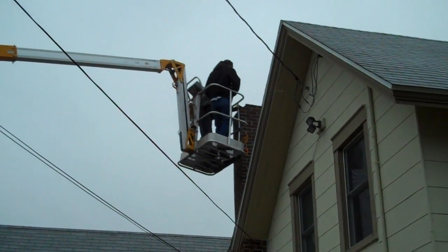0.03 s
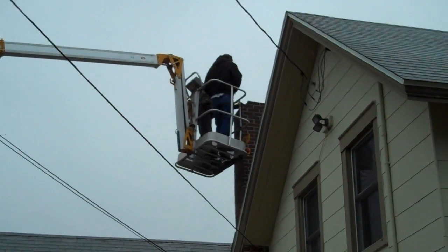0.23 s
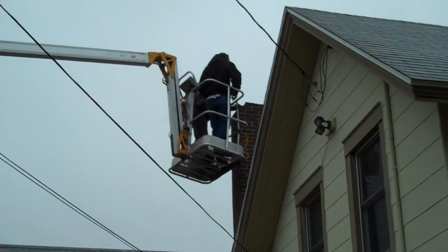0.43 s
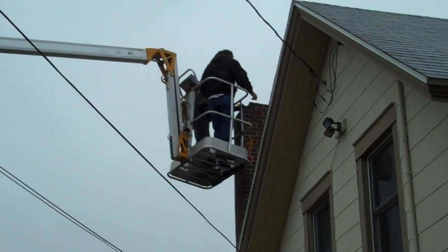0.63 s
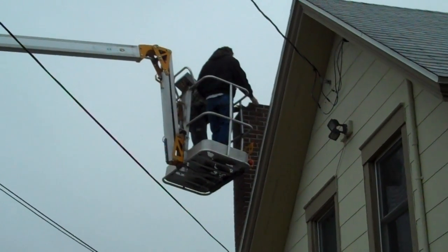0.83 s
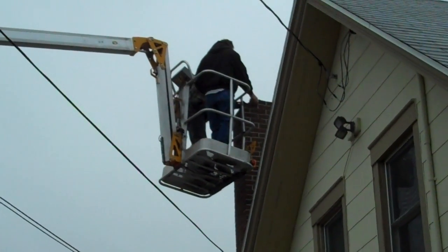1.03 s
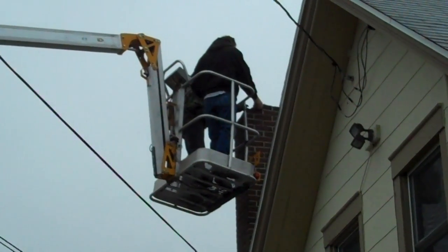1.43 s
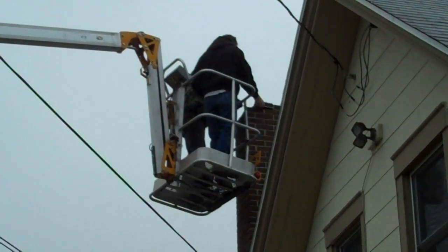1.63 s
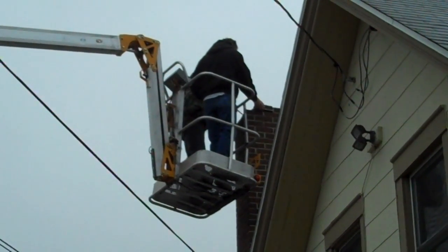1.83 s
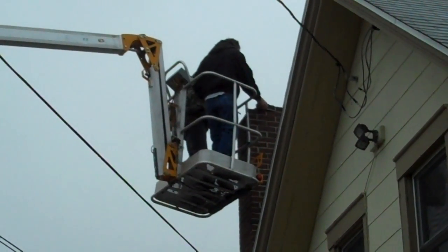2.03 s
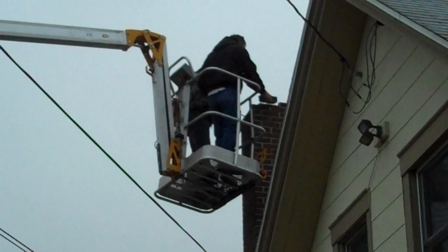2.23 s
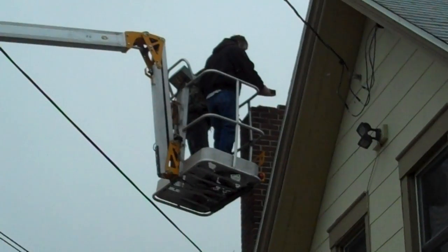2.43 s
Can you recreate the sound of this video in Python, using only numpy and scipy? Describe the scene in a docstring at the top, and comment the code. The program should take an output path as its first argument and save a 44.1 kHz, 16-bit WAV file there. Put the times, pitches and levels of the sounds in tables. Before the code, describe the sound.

A brick lands with a loud crash at 0.2 seconds, just after one dry knock, cracking, crumbling and ringing briefly in a yard. Four sharp masonry knocks follow at about 0.3, 0.6, 0.9 and 1.2 seconds. A faint scrape runs from 1.3 to 1.8 seconds, with tiny grit ticks until 2.3. Throughout, a distant lift engine drones quietly with a thin hiss, and light wind rumbles on the microphone.

```python
"""A dry knock of masonry over a distant engine, then a brick lands hard beside a house. A man in a boom lift is
taking down the chimney. The crash cracks, crumbles and booms, and the struck surface rings. More short knocks
follow, each a click with a stony ring, echoing off ground and yard; then a faint scrape and a few ticks of
grit. Underneath, the lift's engine drones with a high hiss above it, and a little wind rumbles on the
microphone."""
import sys
import numpy as np
from scipy import signal
from scipy.fft import rfft, irfft
from scipy.io import wavfile

SR = 44100
rng = np.random.default_rng(int(sys.argv[2]) if len(sys.argv) > 2 else 0)


def log_audio(samples):
    """Write samples as a 16-bit WAV file to the path given in sys.argv[1]."""
    # one column per channel
    frames = np.atleast_2d(samples).T
    # limit to full scale, then quantise
    limited = np.clip(frames, -1, 1)
    pcm = np.round(limited * 32767).astype(np.int16)
    wavfile.write(sys.argv[1], SR, pcm)


N = 114660
T = np.arange(N) / SR
FREQS = np.fft.rfftfreq(N, 1 / SR)


def amp(db):
    """Decibels to gain."""
    return 10 ** (np.asarray(db) / 20)


def unit(x):
    """Scales to rms 1."""
    return x / np.sqrt(np.mean(x ** 2) + 1e-20)


def curve_at(points, hz):
    """Reads a curve on a log-frequency axis."""
    f, value = np.transpose(points)
    return np.interp(np.log(hz + 1), np.log(f + 1), value)


def fader(points):
    """A gain ride through points of time in seconds and level in dB."""
    return amp(np.interp(T, *np.transpose(points)))


def fade(t, t60):
    """Exponential decay, 60 dB down after t60 seconds."""
    return np.exp(-np.log(1000) * t / t60)


def pan(db):
    """Stereo gains that put the left side db above the right."""
    return amp(np.array([[.5], [-.5]]) * db)


def add(mix, start, sound):
    """Mixes a sound in at a start time in seconds."""
    part = mix[:, max(round(start * SR), 0):][:, :sound.shape[-1]]
    part += sound[..., :part.shape[1]]


def noise(colour, likeness, lag=0, size=N):
    """Coloured stereo noise of rms 1; likeness 1 makes both sides alike, the left lag seconds late."""
    hz = np.fft.rfftfreq(size, 1 / SR)
    shared, separate = rfft(rng.standard_normal((2, size)))
    left = shared * np.exp(-2j * np.pi * hz * lag)
    right = likeness * shared + np.sqrt(1 - likeness ** 2) * separate
    return unit(irfft(np.array([left, right]) * amp(curve_at(colour, hz)), size))


def narrow_noise(hz, width_hz, size=N):
    """Noise in one resonance, rms 1."""
    detune = (np.fft.rfftfreq(size, 1 / SR) - hz) / (width_hz / 2)
    return unit(irfft(rfft(rng.standard_normal(size)) / (1 + detune ** 2), size))


def uneven(roughness, grain_hz):
    """A randomly lumpy gain of rms 1."""
    return unit(np.exp(roughness * narrow_noise(0, grain_hz)))


def click(colour, size=4096):
    """A minimum-phase click of energy 1 with the given colour."""
    log_gain = np.log(amp(curve_at(colour, abs(np.fft.fftfreq(size, 1 / SR)))))
    pulse = np.fft.ifft(np.exp(signal.hilbert(log_gain).conj())).real
    return pulse / np.linalg.norm(pulse)


def ring(modes, t):
    """Dying sines, neighbours starting in opposite directions."""
    return sum((-1) ** k * amp(db) * fade(t, t60) * np.sin(2 * np.pi * hz * t)
               for k, (hz, db, t60) in enumerate(modes))


def centre_bass(x, corner_hz):
    """Narrows the low end: long waves reach both sides alike."""
    spectrum = rfft(x)
    to_centre = spectrum.mean(0) - spectrum
    return irfft(spectrum + to_centre / (1 + (FREQS / corner_hz) ** 2), N)


# The roar's colour. Each row: frequency in Hz, relative level in dB.
ROAR_COLOUR = [(30, -18), (100, -8), (160, -1.5), (220, -2.5), (300, -7), (480, -6.5), (640, -1.5),
               (800, 2.5), (1000, -1.5), (1450, -0.06), (2100, -7), (3100, -10), (4000, -16), (5500, -20),
               (9000, -51), (14000, -53)]
# Its fader ride. Each row: time in seconds, level in dB.
ROAR_RIDE = [(0, -36), (.5, -37), (1, -37.5), (1.5, -38.5), (1.9, -39.5), (2.6, -39)]
FAR_LIKENESS, FAR_LAG_S = 0.69, 0.00013


def engine_roar():
    """The lift's engine at a distance: a broad roar that eases off slightly."""
    return noise(ROAR_COLOUR, FAR_LIKENESS, FAR_LAG_S) * fader(ROAR_RIDE)


# The hum's fader ride. Each row: time in seconds, level in dB.
HUM_RIDE = [(0, -60), (1.1, -52), (1.7, -59), (2, -54.5), (2.6, -57.5)]


def engine_hum():
    """The engine's low note, a band of noise so narrow that it wavers."""
    return narrow_noise(hz=154.8, width_hz=17) * fader(HUM_RIDE)


# The hiss's colour. Each row: frequency in Hz, relative level in dB.
HISS_COLOUR = [(1000, -13.5), (3000, -5.5), (4000, -7.5), (5200, -1), (5900, 3), (6450, -6), (7250, -3),
               (8200, -14), (9500, -21), (12300, -21.5), (14500, -28)]
# Its fader ride. Each row: time in seconds, level in dB.
HISS_RIDE = [(0, -37.5), (.17, -39.5), (.55, -46.5), (1.1, -46.5), (1.4, -45), (1.9, -49.5), (2.6, -51)]


def high_hiss():
    """A thin hiss, strongest at the start."""
    return noise(HISS_COLOUR, likeness=.5, lag=FAR_LAG_S) * fader(HISS_RIDE)


# The wind's colour. Each row: frequency in Hz, relative level in dB.
WIND_COLOUR = [(15, -10), (42, 2.5), (70, 0.5), (120, -3.5), (250, -15.5), (600, -36)]
# Its gusts. Each row: time in seconds, level in dB.
WIND_GUSTS = [(0, -56.5), (.8, -63), (1.4, -59), (1.53, -52), (1.7, -59), (2.12, -48), (2.35, -57.5),
              (2.5, -48.5), (2.6, -52)]


def wind():
    """Small gusts rumble on the microphone, wide and leaning right."""
    return noise(WIND_COLOUR, likeness=0.12) * fader(WIND_GUSTS) * pan(db=-5)


# Knock cues. Each row: start in seconds, level in dB, ring pitch in Hz, ring trim in dB,
# treble shelf in dB, left over right in dB.
KNOCK_CUES = [(0.0335, -2.5, 4560, 2.5, -6.5, -1.5), (.3417, -.5, 3206, 3, -2.5, -1),
              (0.3437, -7.5, 3490, 1, 2, -1), (.6461, .5, 3130, 0.5, 0.5, .5),
              (0.9231, -0.5, 4420, 1.5, -1, -1.5), (1.1958, 0.5, 3300, 2.5, -0.5, -1)]
# The stony ring all knocks share. Each row: pitch in Hz, relative level in dB, t60 in seconds.
STONE_MODES = [(925, -30.5, 0.036), (1715, -28.5, .02), (2470, -35, 0.021), (3600, -33, 0.018),
               (5490, -25.5, .012), (6380, -36, .014), (7260, -24, 0.0088)]
# The contact click, which colours the whole knock. Each row: frequency in Hz, relative level in dB.
CONTACT_COLOUR = [(100, -24), (400, -7.5), (900, 1), (1400, 2.5), (2000, -1.5), (3500, 4), (4800, -4),
                  (6300, 4), (7500, 0.5), (8400, -12.5), (10000, -24.5), (14000, -39)]
# Flat noise for grit and echo tails. Each row: frequency in Hz, relative level in dB.
WHITE = [(20, 0), (20000, 0)]
SHELF_HZ, GROUND_ECHO_S, GROUND_ECHO_DB = 5000, .0056, -13


def knocks(size=4096):
    """Masonry knocks: each a click, a short stony ring and a puff of grit, echoed by the ground."""
    out, t = np.zeros((2, N)), T[:size]
    for start, db, hz, ring_db, treble_db, side_db in KNOCK_CUES:
        contact = click([(f, gain_db + treble_db / (1 + (SHELF_HZ / f) ** 6))
                         for f, gain_db in CONTACT_COLOUR])
        impulse = amp(-5) * (t == 0)
        own_ring = amp(ring_db - 21.5) * fade(t, t60=0.015) * np.sin(2 * np.pi * hz * t)
        stone = impulse + ring(STONE_MODES, t) + own_ring
        grit = amp(-17) * noise(WHITE, likeness=0.65, size=size) * fade(t, t60=0.027)
        knock = signal.fftconvolve(stone + grit, contact[None], axes=1) * amp(db) * pan(side_db)
        add(out, start, knock)
        add(out, start + GROUND_ECHO_S, amp(GROUND_ECHO_DB) * knock)
    return out


# The bump's cue. Each row: start in seconds, level in dB.
BUMP_CUES = [(0.0789, -25.5)]
# Its colour. Each row: frequency in Hz, relative level in dB.
BUMP_COLOUR = [(60, -14), (400, -2), (900, 0.5), (1800, -5.5), (3000, -18), (7000, -19), (10000, -35)]


def bump(size=4096):
    """A soft, dull bump just ahead of the crash."""
    out, t = np.zeros((2, N)), T[:size]
    for start, db in BUMP_CUES:
        add(out, start, amp(db) * noise(BUMP_COLOUR, likeness=.9, size=size) * fade(t, t60=0.043))
    return out


# Colours of the crash's three layers. Each row: frequency in Hz, relative level in dB.
CRACK_COLOUR = [(200, -25), (1200, -16), (3000, -8.5), (4800, -8), (6000, 1), (7000, -1.5), (8500, -14.5),
                (11000, -17), (14500, -32)]
CRUMBLE_COLOUR = [(100, -19), (400, -3.5), (750, -2.5), (1250, -1.5), (1700, -1.5), (2100, -6), (2900, .5),
                  (4300, -8.5), (5100, -3), (5900, 2.5), (7300, 0), (8600, -15.5), (11000, -25),
                  (14000, -39)]
BOOM_COLOUR = [(40, -26), (70, -13), (100, -1), (220, -2), (290, -2.5), (390, 4), (520, -5.5), (1000, -12),
               (3000, -30.5)]
# Pieces landing late. Each row: start in seconds, level in dB, t60 in seconds.
LATE_PIECES = [(.233, -19, 0.095), (0.269, -21, 0.085), (.279, -26, 0.046)]
# Low thuds of the structure. Each row: start in seconds, level in dB, pitch in Hz, t60 in seconds.
THUD_CUES = [(.219, -28, 249, 0.099), (.262, -30, 384, 0.18), (.288, -29.5, 199, 0.11),
             (.29, -32, 105, .13)]
# The struck surface's ring. Each row: pitch in Hz, level in dB, t60 in seconds.
SURFACE_MODES = [(338.4, -35.5, 0.6), (398, -31.5, 0.43), (691, -25, 0.23), (728, -24.5, .18),
                 (1190, -18, 0.15), (1671, -17, 0.14), (2550, -26, .2), (3240, -29, .15), (5610, -22, 0.25),
                 (6020, -23, .18), (6212, -20, 0.23), (6590, -29, .2)]
# Panning by band, on top of each layer's own. Each row: frequency in Hz, left over right in dB.
CRASH_LEAN = [(100, -0.5), (2400, -0.5), (4400, -4), (6500, -4.5), (8000, 12), (10000, 14), (14500, 15)]
CRASH_S, CRASH_LAG_S = .2, .00002
THUD_RISE_S, SURFACE_RISE_S = 0.0066, 0.0028


def brick_crash():
    """The brick lands: bright crack, dense crumble, slower boom, late pieces, thuds, ringing surface."""
    out, t = np.zeros((2, N)), T[:SR]
    crack = crash_layer(CRACK_COLOUR, rise_s=0.12, t60=0.0868, likeness=0.55)
    crumble = crash_layer(CRUMBLE_COLOUR, rise_s=0.01, t60=0.3177, likeness=1)
    boom = crash_layer(BOOM_COLOUR, rise_s=0.03, t60=0.56, likeness=0.5)
    add(out, CRASH_S, amp(-5) * crack * pan(db=0.5))
    add(out, CRASH_S - 0.002, amp(-10.5) * crumble * pan(db=-1))
    add(out, CRASH_S + 0.04, amp(-27) * boom * pan(db=-1.5))
    for start, db, t60 in LATE_PIECES:
        add(out, start, amp(db) * noise(CRUMBLE_COLOUR, likeness=0.77, size=SR) * fade(t, t60))
    for start, db, hz, t60 in THUD_CUES:
        add(out, start, ring([(hz, db, t60)], t) * np.minimum(t / THUD_RISE_S, 1))
    add(out, CRASH_S, ring(SURFACE_MODES, t) * np.minimum(t / SURFACE_RISE_S, 1))
    return irfft(rfft(out) * pan(curve_at(CRASH_LEAN, FREQS)), N)


def crash_layer(colour, rise_s, t60, likeness):
    """Many contacts falling unevenly: grainy noise that is already decaying as it ramps in."""
    contacts = noise(colour, likeness, CRASH_LAG_S) * uneven(roughness=0.24, grain_hz=450)
    return contacts * np.minimum(T / rise_s, 1) * fade(T, t60)


# The scrape's colour. Each row: frequency in Hz, relative level in dB.
SCRAPE_COLOUR = [(500, -23), (1100, -12), (1480, 2), (2000, -7), (2500, -13), (4000, -20), (6000, -13),
                 (12000, -42)]
# Its fader ride. Each row: time in seconds, level in dB.
SCRAPE_RIDE = [(0, -88), (1.15, -67), (1.3, -45.5), (1.6, -43.5), (1.75, -47), (1.9, -70)]


def scrape():
    """Masonry rubs faintly and unevenly, off to the right."""
    rub = noise(SCRAPE_COLOUR, FAR_LIKENESS, FAR_LAG_S) * uneven(roughness=0.46, grain_hz=60)
    return rub * fader(SCRAPE_RIDE) * pan(db=-4.5)


# Grit cues. Each row: start in seconds, level in dB, pitch in Hz.
TICK_CUES = [(1.2515, -42, 6800), (1.594, -44.5, 12000), (1.605, -53, 11000), (2.253, -46, 7000)]


def grit_ticks(size=4096):
    """Bits of grit tick faintly, each a tiny burst of bright noise."""
    out, t = np.zeros((2, N)), T[:size]
    for start, db, hz in TICK_CUES:
        add(out, start, amp(db) * narrow_noise(hz, width_hz=2800, size=size) * fade(t, t60=.025))
    return out


def reverberate(x, tail):
    """Plays a sound through a stereo tail, scaled to energy 1 on the left."""
    return signal.fftconvolve(x, tail / np.linalg.norm(tail[0]), axes=1)[:, :N]


def eaves_echo(x, size=8192):
    """A quick scatter of reflections from the roof and the wall."""
    t = T[:size]
    tail = noise(WHITE, likeness=0.51, size=size) * fade(t, t60=0.12) * (t > GROUND_ECHO_S)
    return amp(-13) * reverberate(x, tail)


# The yard's reverb time. Each row: frequency in Hz, t60 in seconds.
YARD_DECAY = [(100, .8), (400, .9), (1000, 0.82), (2500, .7), (6000, 0.74), (12000, 0.62)]
CRASH_SEND_DB, SMALL_SEND_DB = -16, -19


def yard_echo(x):
    """Scattered reflections from the houses, each band dying at its own speed."""
    hz, t, bands = signal.stft(noise(WHITE, likeness=0.56, size=SR), SR, nperseg=256)
    decay = fade(t, curve_at(YARD_DECAY, hz)[:, None])
    _, tail = signal.istft(bands * decay, SR, nperseg=256)
    return reverberate(x, tail)


# Where roar and hiss sit. Each row: frequency in Hz, left over right in dB.
BED_LEAN = [(300, -.5), (700, 0), (1300, -5), (4400, -5), (8000, 2.5)]


def background():
    """The bed: roar and hiss panned band by band, with the hum and the wind."""
    air = centre_bass(engine_roar() + high_hiss(), corner_hz=600)
    air = irfft(rfft(air) * pan(curve_at(BED_LEAN, FREQS)), N)
    return air + engine_hum() + wind()


def scene():
    """The crash and the small hits echo in the yard, over the scrape and the background."""
    crash = brick_crash()
    small_hits = knocks() + bump() + grit_ticks()
    yard = yard_echo(amp(CRASH_SEND_DB) * crash + amp(SMALL_SEND_DB) * small_hits)
    masonry = centre_bass(crash + small_hits + eaves_echo(small_hits) + yard, corner_hz=450)
    return masonry + scrape() + background()


def record(dry):
    """The loudest peaks overload softly; then a steep low-pass takes off the very top."""
    clipped = dry / (1 + dry ** 6) ** (1 / 6)
    lowpass = signal.firwin(511, cutoff=14350, window=("kaiser", 9), fs=SR)
    return signal.oaconvolve(clipped, lowpass[None], "same")


dry = scene()
out = record(dry)
log_audio(out)
```